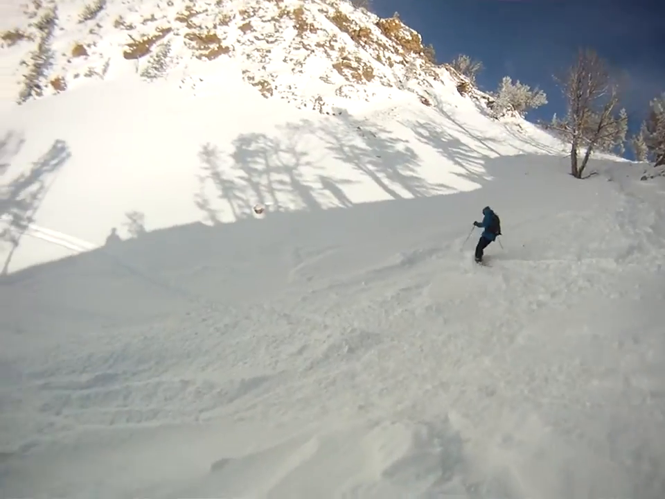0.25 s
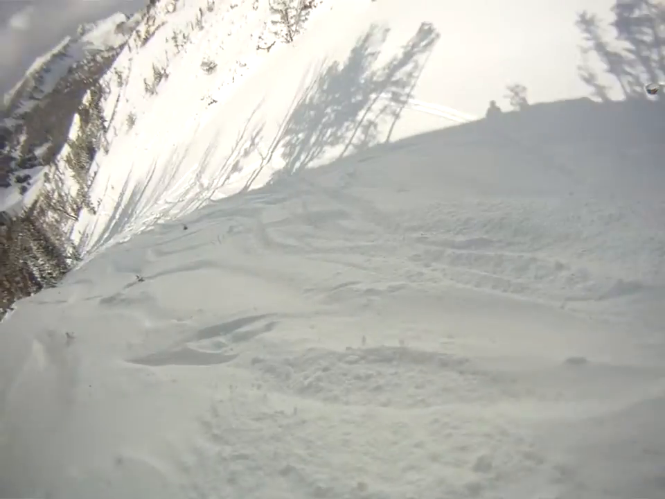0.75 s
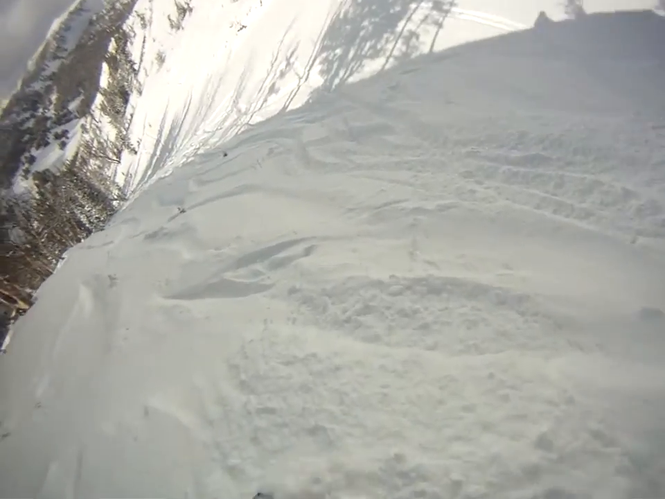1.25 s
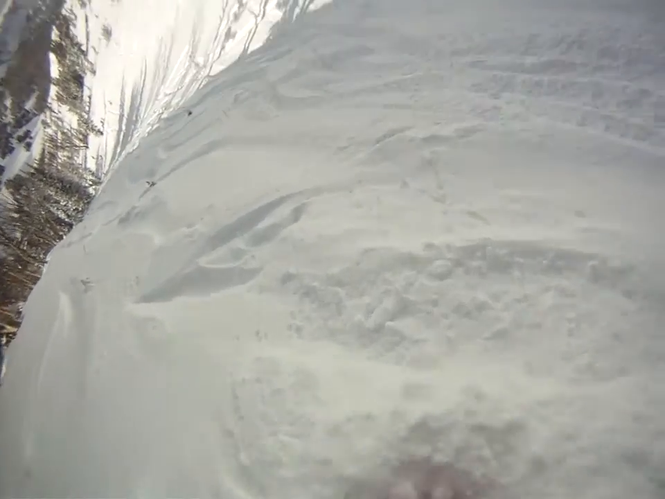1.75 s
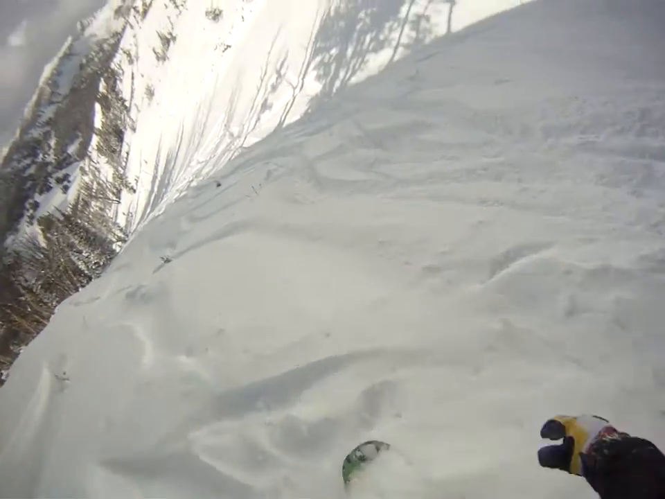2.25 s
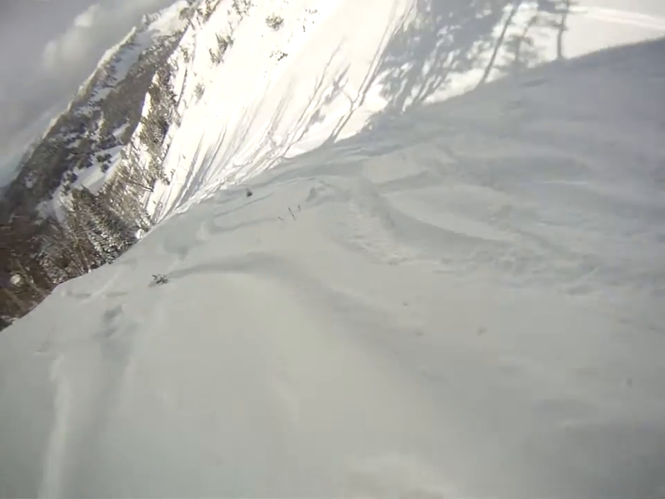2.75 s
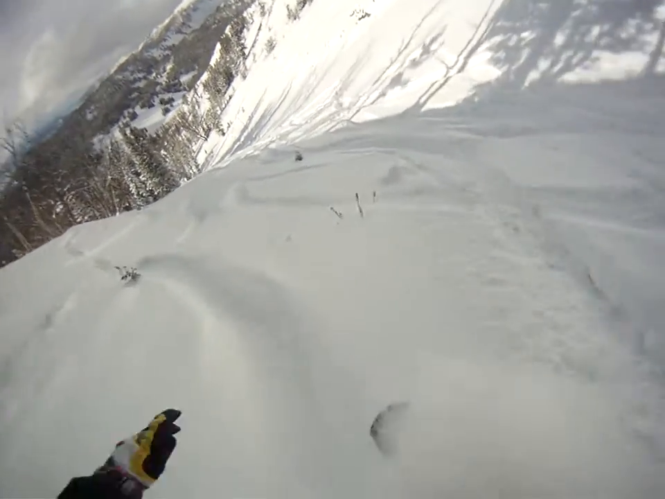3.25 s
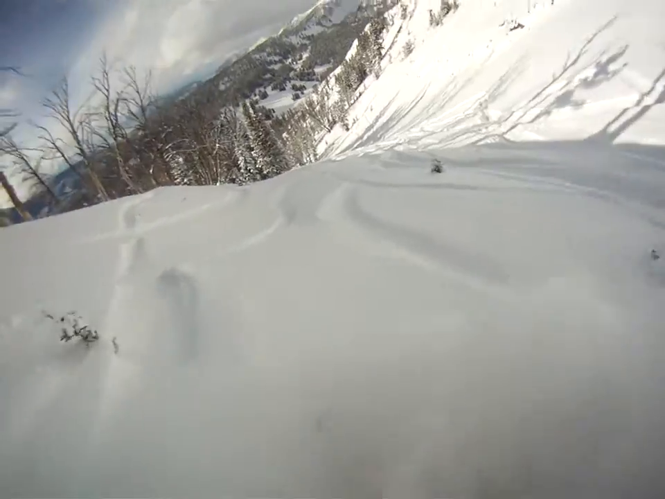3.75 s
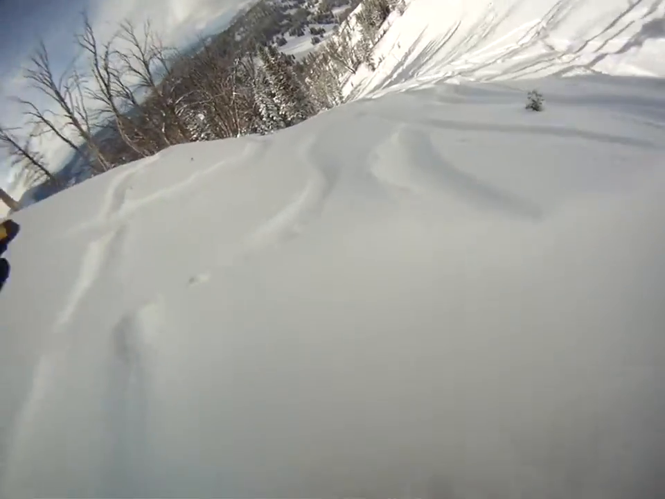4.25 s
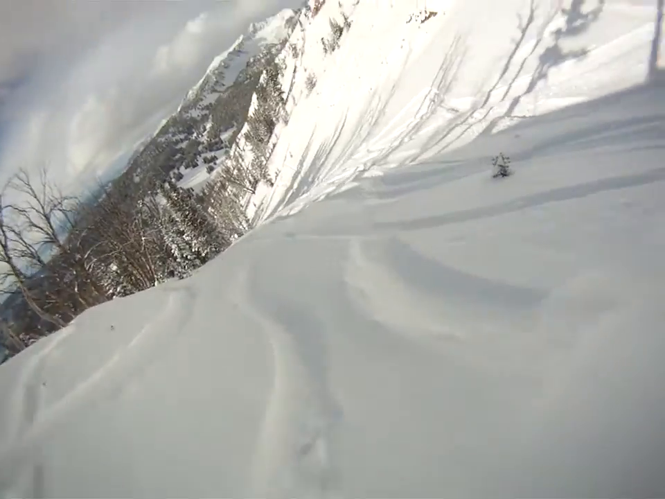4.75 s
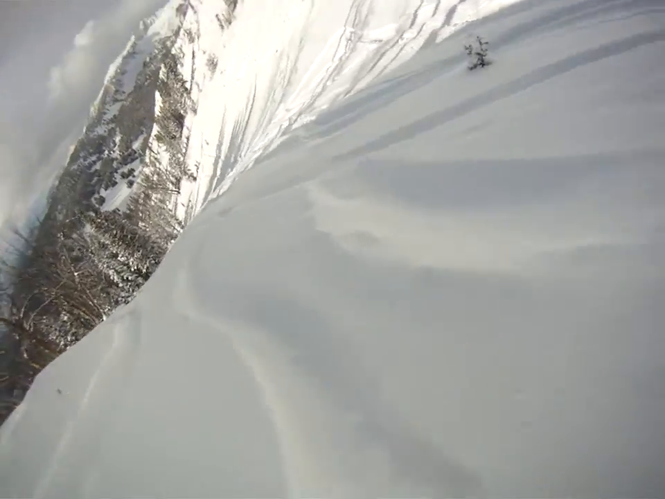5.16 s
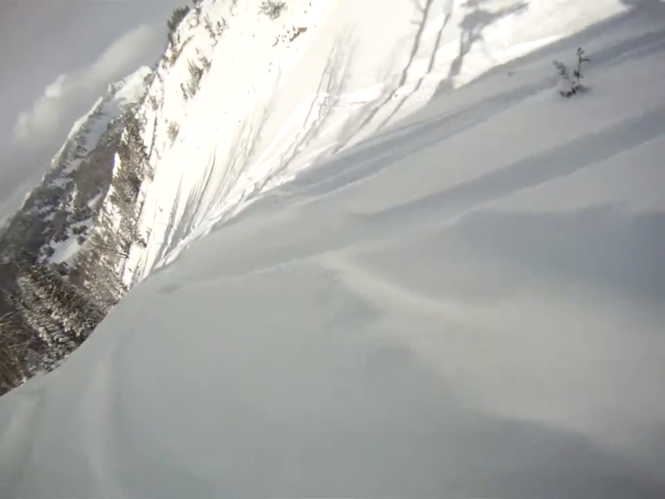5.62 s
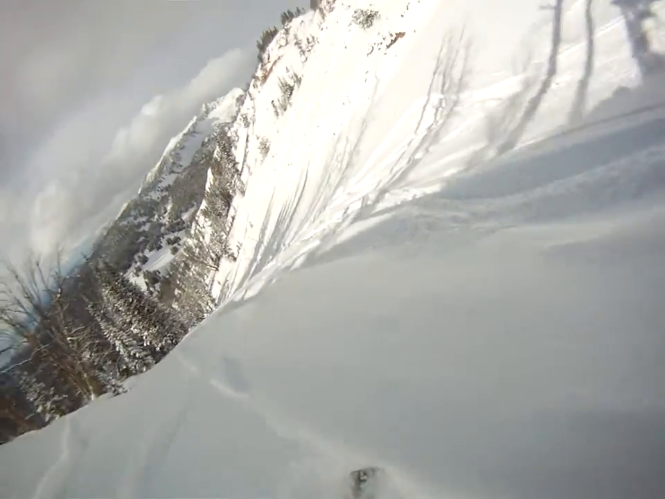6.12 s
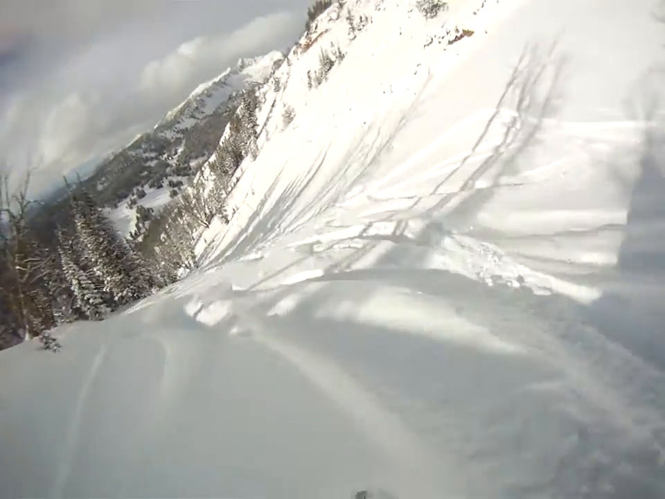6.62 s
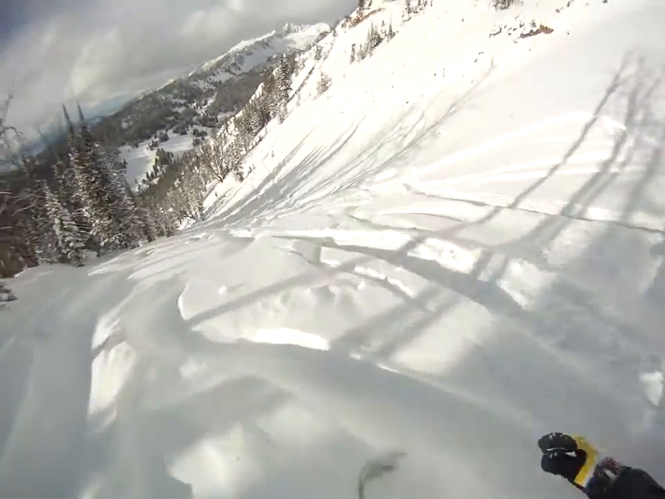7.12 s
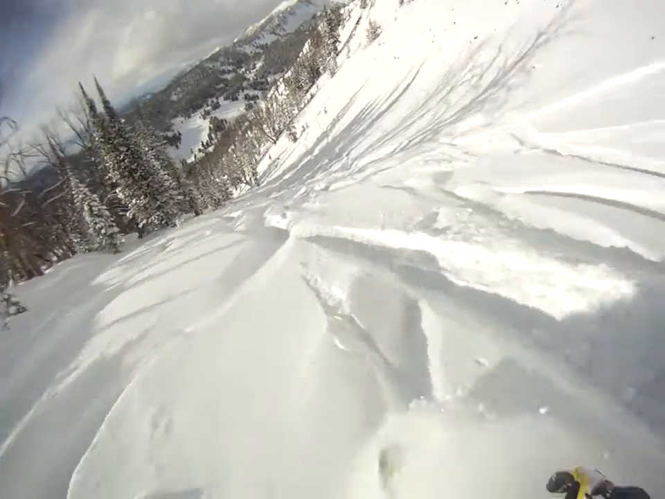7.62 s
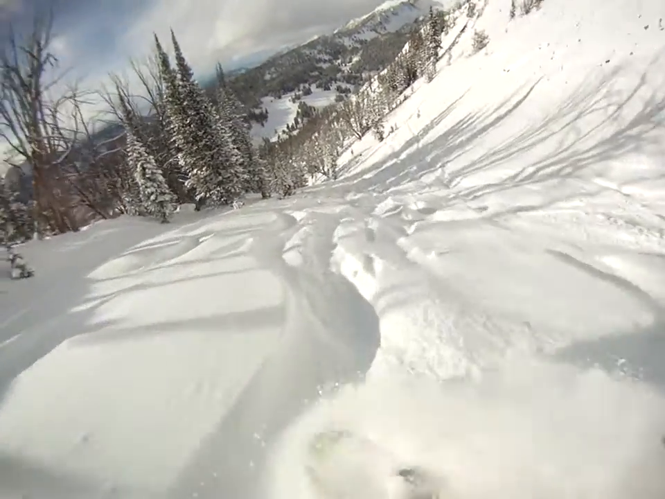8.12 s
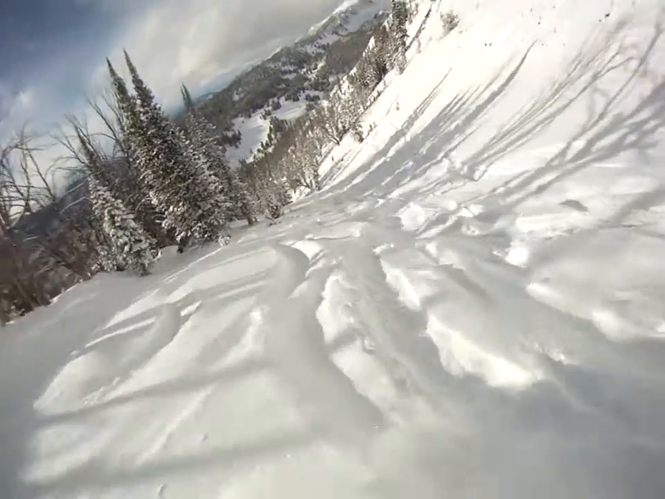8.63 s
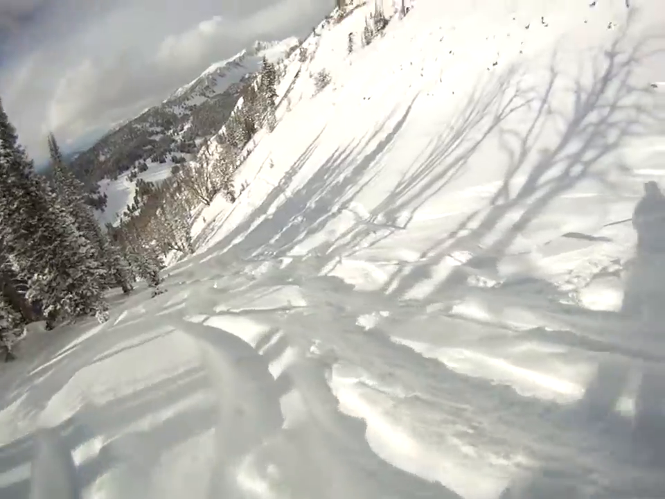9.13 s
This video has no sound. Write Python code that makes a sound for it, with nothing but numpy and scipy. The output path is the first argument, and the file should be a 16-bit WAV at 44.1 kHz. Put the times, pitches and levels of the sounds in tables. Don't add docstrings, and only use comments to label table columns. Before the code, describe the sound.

Close, boxy helmet-camera sound of a skier dropping into powder. First comes quiet wind buffeting with scratchy jacket rustle and small strap creaks. Then dense snow spray rises to a strong hissing rush around three seconds, eases into rustles and crisp ticks, and returns in shorter turns. Low wind lumps continue throughout, with faint preamp hiss and a harsh, grainy treble edge; no room echo outdoors.

```python
import sys
import numpy as np
from scipy import signal
from scipy.fft import rfft, irfft, next_fast_len
from scipy.io import wavfile
from scipy.ndimage import uniform_filter1d, map_coordinates

SR = 44100
rng = np.random.default_rng(int(sys.argv[2]) if len(sys.argv) > 2 else 0)


def linear_from_db(decibels):
    return 10 ** (np.asarray(decibels, float) / 20)


def int16_out(signal):
    q = np.round(np.clip(np.atleast_2d(signal).T, -1, 1) * 32767)
    wavfile.write(sys.argv[1], SR, q.astype(np.int16))


N = 413658


def unit(x):
    return x / np.sqrt(np.mean(x ** 2) + 1e-20)


def along(points, hz):
    point_hz, value = np.transpose(points)
    return np.interp(np.log(hz + 1), np.log(point_hz + 1), value)


def curves(rows):
    time_s, *columns = np.transpose(rows)
    return [np.interp(np.arange(N) / SR, time_s, column) for column in columns]


def wobble(rate_hz):
    coarse = map_coordinates(rng.standard_normal(4000), [np.arange(0, N + 32, 32) * rate_hz / SR])
    return np.interp(np.arange(N) / 32, np.arange(len(coarse)), coarse)


def filtered(x, response):
    size = next_fast_len(N + 8192)
    return irfft(rfft(x, size) * response(np.fft.rfftfreq(size, 1 / SR)), size)[..., :N]


def ring(x, hz, width_hz):
    return signal.lfilter(*signal.iirpeak(hz, hz / width_hz, SR), x)


def modes(table):
    def response(f):
        return sum(linear_from_db(db) * 1j * f * w / (hz * hz - f * f + 1j * f * w) for hz, w, db in table)
    return response


def rush(spectrum):
    size = next_fast_len(N)
    hz = np.fft.rfftfreq(size, 1 / SR)
    real, imag = rng.standard_normal((2, len(hz)))
    return unit(irfft((real + 1j * imag) * linear_from_db(along(spectrum, hz)), size)[:N])


def strokes(rows, peak):
    power, bright = np.zeros(N + SR), np.zeros(N + SR)
    for start_s, length_s, db, bright_db in rows:
        u = np.arange(round(length_s * SR)) / SR / length_s
        triangle = np.clip(np.minimum(u / peak, (1 - u) / (1 - peak)), 0, 1)
        swell = linear_from_db(2 * db) * triangle ** 1.5
        first = round(start_s * SR)
        power[first:][:len(u)] += swell
        bright[first:][:len(u)] += swell * bright_db
    return power[:N], bright[:N]


def gusts(rows):
    knots_s = np.arange(0, N / SR + .01, .005)
    change_db = sum(db * np.exp(-((knots_s - s) / width_s) ** 2) for s, width_s, db in rows)
    return np.interp(np.arange(N) / SR, knots_s, change_db)


# [start_s, peak_db, pitch_hz]
EDDIES = [(0.489, -48, 21.5), (0.634, -34.5, 46), (0.772, -30.5, 59.4), (1.043, -36.5, 61.7),
          (1.327, -44, 42.8), (1.617, -29, 54.4), (2.056, -36, 40.7), (2.305, -30, 30.3),
          (2.564, -25.5, 27.4), (2.769, -33, 27.8), (2.945, -32, 41.4), (3.679, -34, 32.3),
          (3.975, -32, 28.8), (4.898, -54, 30.5), (5.049, -36.5, 58.7), (5.483, -35, 30),
          (6.214, -39.5, 32.7), (6.317, -36, 33), (6.761, -62, 35.0), (6.86, -56, 48), (7.101, -30.5, 43.3),
          (7.593, -43, 21.5), (7.601, -32, 22.7), (8.268, -34.5, 32.2), (8.692, -38, 37.6)]


def eddies():
    cycles, gain_db = 2.53, -2.5
    push = np.zeros(N + SR)
    for (start_s, db, hz), phase in zip(EDDIES, rng.random((len(EDDIES), 1))):
        turn = np.arange(round(cycles / hz * SR)) / SR * hz
        swell = np.sin(np.pi * turn / cycles) ** 2
        push[round(start_s * SR):][:len(turn)] += linear_from_db(db + gain_db) * swell * np.sin(2 * np.pi * (turn + phase))
    return push[:N]


# [time_s, strength_db, large_eddies_over_it_db]
WIND = [(0, -73, 12.5), (.43, -70, 9), (.62, -62.5, 13), (1.5, -65, 15.5), (2.15, -64.5, 19),
        (2.6, -56.5, 14), (3.24, -53.5, 12), (3.97, -57.5, 19.5), (4.75, -63.5, 12), (5.4, -61.5, 20.5),
        (5.65, -53.5, 9), (6.3, -56.5, 5), (6.5, -60.5, 10.5), (7.1, -56, 6), (7.8, -58.5, 18),
        (8.15, -51.5, -0.5), (8.4, -54.5, 13), (8.8, -64, 11)]
# [freq_hz, density_db_per_hz]
BUFFET = [(6, -26), (12, -2), (27, -1.5), (45, -6.5), (70, -32), (120, -54.5)]
FLUTTER = [(30, -33), (50, 0.5), (70, -1), (105, -13.5), (160, -50), (300, -75)]
ROAR = [(65, -28), (110, 1.5), (204, -11.5), (454, -21), (750, -29.5), (1500, -25), (5000, -43),
        (6500, -45)]
# [centre_s, width_s, change_db]
HEAD_TURNS = [(.88, 0.049, -3), (1.0, .05, 2.5), (1.55, .05, -4.5), (1.95, 0.035, 3), (2.45, 0.025, -2),
              (3.57, 0.039, 4), (3.9, 0.086, -4.5), (4.6, 0.046, 3), (4.8, 0.063, -0.5), (4.93, .03, 7),
              (5.2, 0.063, 5), (5.93, 0.12, -6), (6.08, 0.057, 2), (7.2, 0.13, 1.5), (7.47, 0.093, -3.5),
              (7.7, 0.043, 1.5), (8.2, 0.027, -6), (9.1, 0.15, 1.5), (9.36, 0.033, 6.5)]
# [centre_s, width_s, change_db]
ROAR_GUSTS = [(.3, .2, 1), (1.3, .15, -1.5), (2.3, .1, 2.5), (3.9, .15, 2), (4.17, .08, 4),
              (5.45, 0.11, 3.5), (6.4, .1, -1), (7.5, .06, 6), (8.95, 0.14, 7)]


def wind():
    strength_db, large_db = curves(WIND)
    lumps = wobble(9)
    buffet = linear_from_db(large_db + 0.5 + 0.14 * lumps) * rush(BUFFET)
    flutter = linear_from_db(0.39 * large_db + 3.5 + 0.27 * lumps) * rush(FLUTTER)
    roar = linear_from_db(-0.6 + gusts(ROAR_GUSTS) + 0.16 * lumps) * rush(ROAR)
    return linear_from_db(strength_db + gusts(HEAD_TURNS)) * (buffet + flutter + roar) + eddies()


# [freq_hz, density_db_per_hz]
SNOW = [(290, -57), (500, -25), (735, -21.5), (998, -10), (1250, -1.5), (1700, -1.5), (1900, -4),
        (2330, -6), (2820, -8), (3170, -8.5), (4220, -22.5), (5000, -18.5), (5300, -13.5), (6890, -71),
        (11700, -120)]
# [freq_hz, width_hz, lift_db]
SKI_RINGS = [(1290, 104, 2), (1728, 110, 2.5), (2400, 190, 2.5), (3060, 110, 0)]


def spray():
    def lift(f):
        return linear_from_db(sum(db * np.exp(-((f - hz) / width_hz) ** 2) for hz, width_hz, db in SKI_RINGS))
    return filtered(rush(SNOW), lift)


def patchy(x, db):
    z = signal.stft(x, nperseg=512)[2]
    over_freq = uniform_filter1d(rng.standard_normal(z.shape), size=3, axis=0)
    field = uniform_filter1d(over_freq, size=8, axis=1)
    return signal.istft(z * linear_from_db(db * unit(field)), nperseg=512)[1][:N]


def grains(rate_hz, spread_db):
    count = N // 14
    at = np.cumsum(rng.exponential(size=count)) * SR / rate_hz
    size = linear_from_db(spread_db * rng.exponential(size=count)) * rng.standard_normal(count)
    return np.bincount(at.astype(int), size, N)[:N]


# [freq_hz, width_hz, level_db]
CASE = [(1290, 290, -5.5), (2010, 350, 2), (2700, 410, -8), (3320, 490, -6), (5040, 78, -15)]


def cloth():
    shared_db = 0.46 * wobble(35) + 0.45 * wobble(120)
    total = np.zeros(N)
    for hz, width_hz, db in CASE:
        own_db = 3.06 * wobble(45)
        crackle = unit(ring(grains(rate_hz=3500, spread_db=1.9), hz, width_hz))
        total += linear_from_db(db + shared_db + own_db) * crackle
    return unit(total)


# [start_s, length_s, level_db, brightness_db]
RUBS = [(.55, 0.14, -43, 0.5), (.66, 0.074, -51, -9), (.76, 0.16, -68, -41), (.86, 0.32, -55.5, -9),
        (1.06, 0.18, -64, -6), (1.33, 0.043, -59, -2), (1.385, 0.12, -56.5, 1), (1.51, .06, -73, -6),
        (1.59, 0.18, -59.5, -1), (1.735, 0.17, -51.5, -4), (2.08, 0.042, -53.5, -16),
        (2.155, 0.046, -61, -3), (2.245, 0.06, -57, -14), (2.58, 0.15, -43.5, -2), (3.17, 0.075, -50, 2),
        (4.305, 0.057, -44.5, 10), (4.41, 0.12, -54.5, 5), (4.635, 0.08, -48, -2), (4.345, 0.035, -49, 4),
        (9.19, 0.044, -47, 12), (4.87, 0.13, -42.5, -2), (5.29, 0.38, -47.5, -9), (5.38, 0.31, -49, 12.5),
        (5.99, 0.13, -44.5, -10.5), (6.09, 0.2, -40.5, -4), (7.6, 0.15, -40.5, -8), (8.93, 0.093, -55, 7)]
# [start_s, length_s, level_db, brightness_db]
PULLS = [(.46, 0.07, -50, -1.5), (1.2, 0.11, -49.5, -4), (1.885, 0.062, -51.5, -19),
         (3.92, 0.077, -48.5, 3), (4.775, 0.024, -55, 5), (6.31, 0.088, -55, -5), (7.2, 0.13, -50, -4),
         (8.84, 0.078, -48.5, 4.5), (9.13, 0.046, -50, 4.5), (8.96, 0.046, -64, -11), (.78, 0.037, -61, 0),
         (5.15, 0.067, -48.5, 0), (9.2, .045, -53, 8)]
# [start_s, peak_db]
TAPS = [(0.7233, -36), (1.1842, -31), (1.2196, -33.5), (1.5369, -42), (1.6003, -35.5), (1.9155, -40),
        (2.0892, -37), (2.2578, -36.5), (2.6584, -26), (3.1822, -26.5), (3.9629, -28), (4.4957, -27.5),
        (4.6409, -29.5), (4.7296, -42), (4.7721, -33), (5.4595, -28), (6.2637, -31), (7.6725, -27),
        (8.9032, -28.5), (9.0059, -46), (9.1002, -35), (9.1765, -27.5), (9.2264, -28)]


def rubs():
    tug_rows = [(start_s, 0.028, db - 24, 0.5) for start_s, db in TAPS]
    rub, rub_bright = strokes(RUBS, peak=0.35)
    tug, tug_bright = strokes(tug_rows, peak=0.06)
    pull, pull_bright = strokes(PULLS, peak=0.81)
    return rub + tug + pull, rub_bright + tug_bright + pull_bright


def brighter(x, db):
    def treble(hz):
        return 1 / (1 + (2700 / (hz + 1)) ** 6) / (1 + (hz / 5000) ** 4)
    return x + (linear_from_db(db) - 1) * filtered(x, treble)


# [time_s, level_db, rustle_share_0_1, brightness_db]
CARVE = [(0, -78.5, 0.4, 8), (.46, -73.5, 0.1, 6), (.56, -65.5, 0.76, 10), (2.25, -62.5, 0.7, 1),
         (2.6, -54.5, 0, -2), (3.4, -47.5, 0.4, 4), (3.88, -52, 1, -7), (4.0, -56, 0.25, 5.5),
         (4.85, -57.5, 0.7, -1), (5.1, -53, 0.16, -5.5), (5.95, -58, 0.1, 3), (6.2, -46, 0.1, 4),
         (6.45, -61, 0.66, -5.5), (7.0, -49, 0.01, 4.5), (7.44, -56, 0.3, 0), (7.78, -55, 0.04, 5),
         (8.35, -51.5, 0.08, -1), (8.53, -60.5, 0.33, 8)]
# [start_s, length_s, level_db, brightness_db]
SURGES = [(2.33, 0.26, -54, -2), (2.44, 0.22, -49, 4.5), (2.64, 0.28, -48.5, 7.5), (2.82, 0.16, -47, 1.5),
          (3.04, 0.14, -44, 5.5), (3.17, 0.25, -46, -4), (3.35, 0.19, -41.5, 4), (3.5, 0.25, -44.5, 2.5),
          (3.7, 0.23, -48, 6.5), (4.08, 0.17, -48.5, 2.5), (4.235, 0.085, -51.5, 8), (4.33, 0.11, -60, 26),
          (4.95, 0.13, -50, 5), (5.06, 0.16, -52.5, -4), (5.48, 0.46, -56.5, 12.5), (6.2, 0.25, -51.5, -2),
          (6.5, 0.21, -55.5, 4), (6.76, 0.14, -56.5, 8), (6.87, 0.18, -48.5, -1), (7.45, 0.29, -48, -0.5),
          (7.76, 0.22, -53, 7), (7.8, 0.19, -54, 9), (7.9, 0.25, -50.5, 2.5), (8.05, 0.18, -51.5, -2),
          (8.24, 0.1, -48.5, -3)]
# [freq_hz, density_db_per_hz]
BODY = [(90, -15), (180, 2.5), (400, -6.5), (700, -16.5), (1200, -62)]


def slide():
    level_db, rustle, bright_db = curves(CARVE)
    steady = linear_from_db(2 * level_db)
    surge, surge_bright = strokes(SURGES, peak=0.51)
    rub, rub_bright = rubs()
    power = steady + surge + rub
    share = np.clip((rustle * steady + 0.019 * surge + 0.81 * rub) / power, 0, 1)
    unsteady_db = 0.74 * wobble(24) + 1.08 * wobble(80)
    snow = unit(linear_from_db(unsteady_db) * patchy(spray(), db=1.0))
    body = linear_from_db(-19.5) * rush(BODY)
    both = np.sqrt(1 - share) * snow + np.sqrt(share) * cloth() + body
    mean_bright_db = (steady * bright_db + surge_bright + rub_bright) / power
    return np.sqrt(power) * brighter(both, mean_bright_db)


# [freq_hz, density_db_per_hz]
HISS = [(60, -58), (150, -1), (500, -4.5), (800, -5), (2000, -11.5), (5200, -12.5), (6000, -14)]


def hiss():
    return linear_from_db(-63.0) * rush(HISS)


# [freq_hz, density_db_per_hz]
APART = [(35, -18), (60, -19), (259, -6.5), (333, -7), (367, -7), (3000, -16), (5240, -11), (6000, -27),
         (7800, -59), (13200, -120)]


def apart():
    return linear_from_db(-78.0) * rush(APART)


# [start_s, length_s, level_db, pitch_hz]
SWISHES = [(1.401, 0.031, -53.5, 1250), (2.498, 0.13, -53, 1650), (2.638, 0.036, -50, 1960),
           (2.855, 0.081, -61, 1650), (3.053, 0.054, -51, 2430), (3.167, 0.077, -45.5, 1970),
           (3.228, 0.12, -49, 1640), (3.38, .05, -54, 2350), (3.39, 0.084, -46, 1730),
           (3.55, .11, -48, 1700), (6.902, 0.14, -54, 1650), (7.18, 0.15, -53, 1230),
           (7.544, 0.21, -52, 1600), (7.84, .2, -56, 2510), (7.933, 0.073, -48.5, 1620),
           (7.978, 0.28, -54, 1310), (8.028, .15, -62, 1700), (8.273, 0.11, -53.5, 1310),
           (0.658, 0.16, -67, 1980), (0.855, 0.16, -66, 2000), (1.046, 0.21, -60, 1980),
           (1.597, 0.13, -66, 2060), (8.556, 0.29, -64, 2000), (8.82, 0.091, -58, 2020),
           (8.928, 0.11, -59, 2010), (9.144, 0.12, -59, 1970), (7.776, 0.27, -65, 1350),
           (8.12, 0.22, -63, 1460), (0.476, 0.043, -54, 1270), (3.204, 0.17, -54, 1410),
           (7.577, 0.17, -52, 1400), (2.702, 0.045, -51, 2000), (.56, 0.12, -51, 1880),
           (0.577, .08, -55, 3400), (4.315, 0.039, -48, 2500)]


def swishes():
    out = np.zeros(N + SR)
    for start_s, length_s, db, hz in SWISHES:
        band = unit(ring(rng.standard_normal(SR // 4), hz, width_hz=83))[:round(length_s * SR)]
        out[round(start_s * SR):][:len(band)] += linear_from_db(db) * np.hanning(len(band)) * band
    return out[:N]


# [start_s, peak_db, pitch_hz]
FLECKS = [(.695, -50, 3200), (.806, -50, 1400), (.882, -47, 1700), (1.02, -54, 3000), (1.235, -48, 3000),
          (1.265, -48, 3300), (1.537, -47, 2050), (1.692, -50, 2300), (1.78, -48, 2400), (1.922, -45, 1990),
          (1.943, -51, 2400), (2.18, -48, 1900), (2.265, -49, 1900), (2.31, -55, 1300), (2.601, -41, 2010),
          (2.621, -35, 1820), (2.627, -40, 3620), (2.641, -43, 1700), (2.674, -39, 4860), (2.72, -41, 3600),
          (3.405, -38, 2310), (3.63, -40, 4260), (3.962, -36, 2000), (4.318, -43, 4800), (4.33, -42, 5000),
          (4.771, -39, 2270), (4.771, -50, 3480), (5.145, -54, 4930), (5.334, -38, 1960),
          (5.401, -36, 2300), (5.5, -41, 2190), (7.625, -44, 1460), (7.649, -39, 1500), (8.3, -42, 1500),
          (8.88, -44, 1250), (8.892, -44, 1990), (8.925, -48, 1100), (8.975, -52, 1050), (9.002, -48, 1990),
          (9.006, -40, 1990), (9.054, -52, 3200), (9.081, -50, 3300), (9.101, -45, 2400),
          (9.114, -48, 3500), (9.127, -48, 2700), (9.204, -49, 1900), (.49, -52, 5000), (.61, -47, 5000),
          (1.19, -56, 5000), (2.258, -46, 2190), (3.182, -37, 1990), (7.014, -37.5, 1450),
          (8.903, -40, 1990), (4.496, -44, 3000), (4.882, -45, 3730), (4.8, -45, 3020), (2.61, -40, 3640),
          (2.635, -41.5, 3700), (4.772, -52, 5050)]


def flecks():
    half_s, width_hz = 0.002003, 630
    out, t = np.zeros(N + SR), np.arange(-SR // 100, SR // 100) / SR
    for start_s, db, hz in FLECKS:
        band = ring(ring(rng.standard_normal(len(t)), hz, width_hz), hz, width_hz)
        burst = np.exp(-(t / half_s) ** 2) * band
        first = round((start_s + half_s + t[0]) * SR)
        out[first:][:len(t)] += linear_from_db(db) * burst / abs(burst).max()
    return out[:N]


# [start_s, length_s, level_db]
MISTS = [(.54, 0.11, -57), (1.33, .2, -69), (2.2, 0.52, -70), (2.5, 0.3, -73), (2.6, 0.045, -59),
         (2.66, .03, -54.5), (3.0, 0.96, -60), (3.4, 0.91, -64), (4.022, 0.65, -60.5), (4.3, 0.25, -67),
         (5.45, 0.65, -68.5), (6.06, .3, -70), (6.5, 0.21, -72), (7.85, 0.99, -69)]


def mist():
    power, _ = strokes([(*row, 0) for row in MISTS], peak=0.32)
    return np.sqrt(power) * unit(ring(rng.standard_normal(N), 5030, width_hz=700))


# [start_s, peak_db, pitch_hz]
SNAPS = [(0.551, -34, 1850), (0.5766, -31, 1860), (1.8791, -30.5, 1850), (1.943, -33.5, 1270),
         (3.063, -29, 1760), (3.2915, -25, 1660), (3.5036, -27, 1640), (3.5515, -25, 1670),
         (4.3206, -25.5, 2320), (4.8823, -30.5, 1180), (4.9397, -26, 2180), (4.9911, -29, 2240),
         (5.0725, -28, 1710), (6.0035, -29, 2360), (6.033, -35, 1680), (6.1145, -42, 2160),
         (6.1473, -25, 1870), (6.343, -31, 1400), (6.3644, -28, 1730), (6.9233, -27, 1720),
         (6.9502, -28, 1730), (6.973, -36, 1290), (7.015, -27.5, 1460), (7.213, -34, 1360),
         (7.5533, -32, 1620), (8.2896, -31, 1440), (8.911, -35.5, 1190), (1.796, -41, 1000),
         (4.317, -20, 3400)]
# [start_s, peak_db, pitch_hz]
SLIPS = [(0.7477, -46, 1960), (0.8126, -39, 1740), (0.8628, -53, 2040), (0.94, -36, 2040),
         (0.9727, -44, 1990), (1.0459, -38, 1940), (1.1197, -38, 1960), (1.1745, -36, 1930),
         (1.2535, -33, 2170), (1.2954, -32, 1970), (1.3448, -42, 1990), (1.6164, -37, 2080),
         (1.6894, -41, 2240), (1.7964, -50, 2030), (1.8344, -32.5, 2140), (1.9854, -43, 2080),
         (2.121, -41, 1380), (2.2177, -42, 1260), (4.2704, -34, 1900), (4.4303, -38, 2140),
         (4.4543, -45, 1980), (4.4815, -31, 1890), (4.615, -34, 1850), (6.171, -24, 2050),
         (6.2234, -22, 1790), (6.857, -30, 2640), (7.7044, -41, 2010), (8.6914, -38, 1340),
         (8.8904, -40, 1990), (9.053, -41, 2190), (9.082, -45, 2000), (9.1274, -49, 1280)]
# [start_s, peak_db, pitch_hz]
SCUFFS = [(0.789, -40, 1930), (0.876, -41, 1980), (0.989, -36, 1870), (1.279, -35, 1990),
          (1.407, -43, 1230), (1.752, -36, 2130), (1.789, -50, 2010), (1.818, -44, 2040),
          (2.169, -42, 1970), (4.335, -41, 2250), (4.684, -37, 1960), (4.772, -27.5, 1150),
          (4.799, -38, 2130), (8.881, -41, 1980), (9.107, -40.5, 2740), (9.194, -35, 1890),
          (9.242, -36, 2100)]


def ticks():
    rise_s, soft_hz = 0.00052, 3400
    tap_t60_s, snap_t60_s, scuff_t60_s, slip_t60_s = 0.011, 0.014, 0.017, 0.0091
    contacts = [(start_s, db, 1990, tap_t60_s) for start_s, db in TAPS]
    contacts += [(*row, snap_t60_s) for row in SNAPS]
    contacts += [(*row, scuff_t60_s) for row in SCUFFS]
    contacts += [(*row, slip_t60_s) for row in SLIPS]
    own, knock, t = np.zeros(N + SR), np.zeros(N + SR), np.arange(SR // 16) / SR
    for start_s, db, hz, t60_s in contacts:
        grit = (1 - np.exp(-t / rise_s)) * linear_from_db(-60 * t / t60_s) * rng.standard_normal(len(t))
        touch = linear_from_db(6.5) * (t == 0)
        note = ring(grit + touch, hz, width_hz=150)
        first = round(start_s * SR)
        own[first:][:len(t)] += linear_from_db(db - 11.0) * note / abs(note).max()
        knock[first:][:len(t)] += linear_from_db(db + 0.5) * (touch + 0.71 * grit)

    def padded(f):
        return linear_from_db(-0.5) / (1 - (f / soft_hz) ** 2 + 1.3j * f / soft_hz)
    return filtered(own[:N] + filtered(knock[:N], modes(CASE)), padded)


# [start_s, length_s, level_db]
DIGS = [
    (3.552, 0.46, -61.5),
    (6.1, 0.16, -55),
    (8.55, 0.59, -70),
]


def digs():
    t = np.arange(N) / SR
    bite = sum(linear_from_db(db) * np.sin(np.pi * np.clip((t - start_s) / length_s, 0, 1))
               for start_s, length_s, db in DIGS)
    scrape = ring(ring(rng.standard_normal(N), 890, width_hz=330), 890, width_hz=330)
    return bite * unit(scrape)


def scene():
    mid = wind() + slide() + hiss() + swishes() + flecks() + mist() + ticks() + digs()
    side = apart()
    return np.array([mid + side, mid - side])


def roll_off(x):
    return signal.sosfilt(signal.butter(12, 16430, fs=SR, output="sos"), x)


def record(dry):
    up, down, steps, top_hz = 40, 147, 4, 15330
    blocks = 2 * next_fast_len(N // down)
    size, period = blocks * down, blocks * up
    bins = np.arange(size // 2 + 1)
    hz = bins * SR / size
    fold = (bins + period // 2) % period - period // 2
    guard = 1 / (1 + (hz / 5650) ** 16)
    images = (rfft(dry, size) * guard)[:, abs(fold)]
    images = np.where(fold < 0, np.conj(images), images)
    u = bins / period
    hold = np.sinc(u) / np.sinc(u / steps) * np.exp(-1j * np.pi * u * (steps - 1) / steps)
    held = irfft(images * hold * (hz < top_hz), size)[:, :N]
    return roll_off(held)


dry = scene()
out = record(dry)
int16_out(out)
```